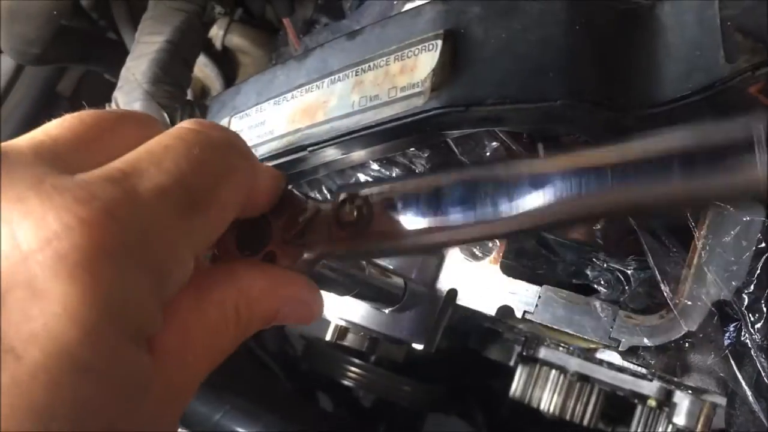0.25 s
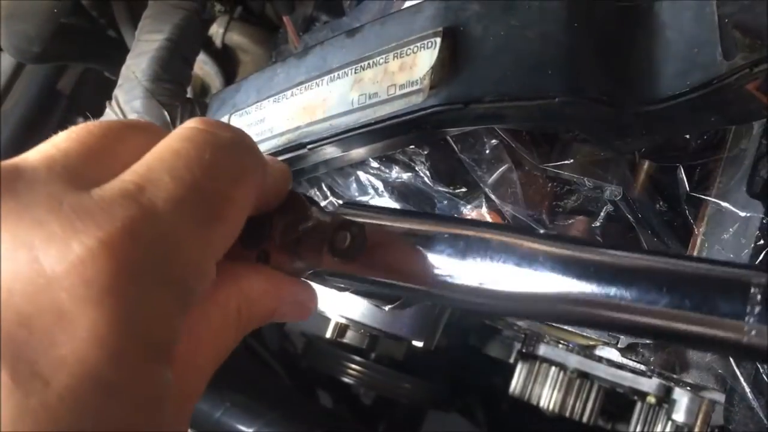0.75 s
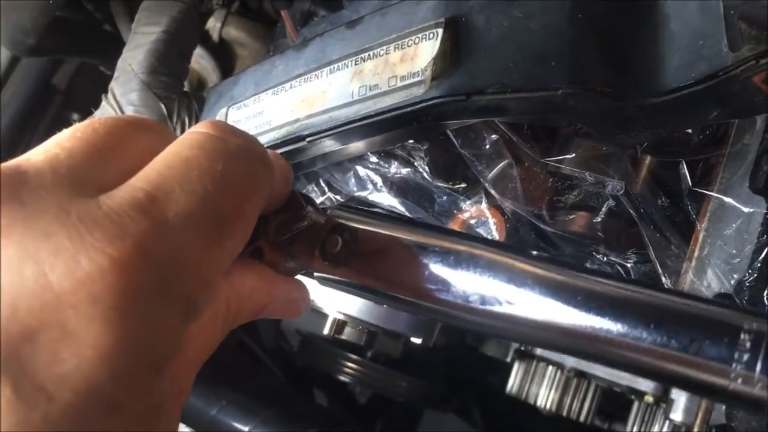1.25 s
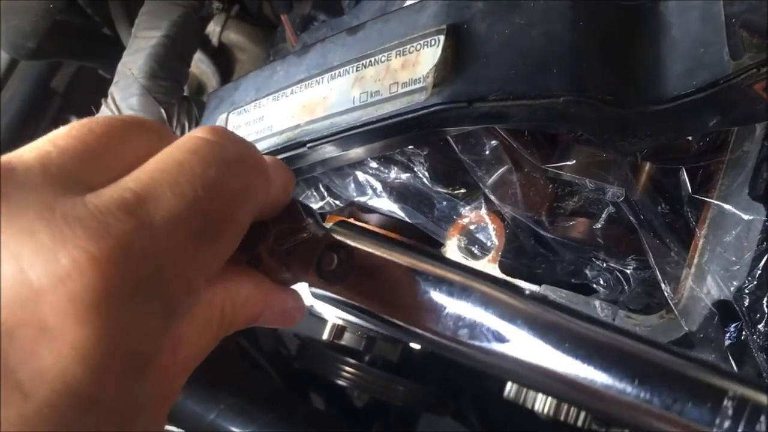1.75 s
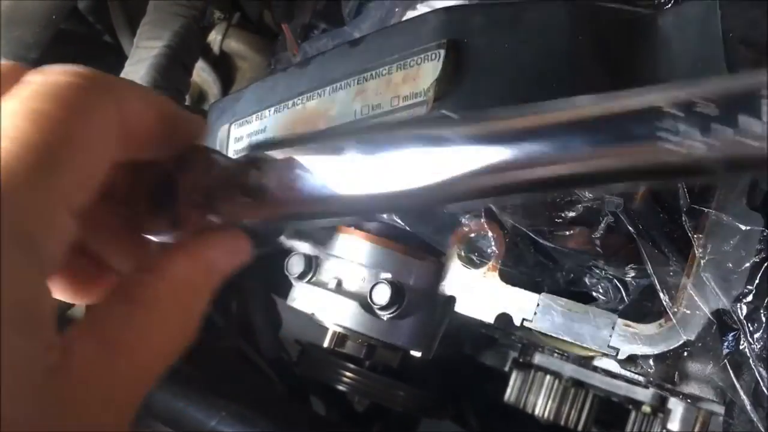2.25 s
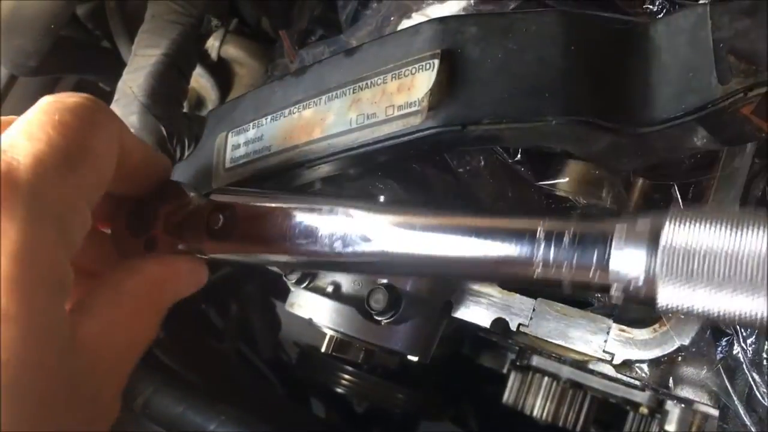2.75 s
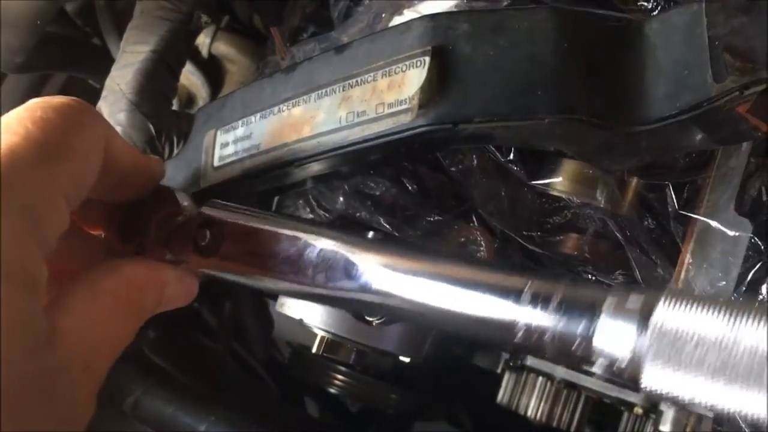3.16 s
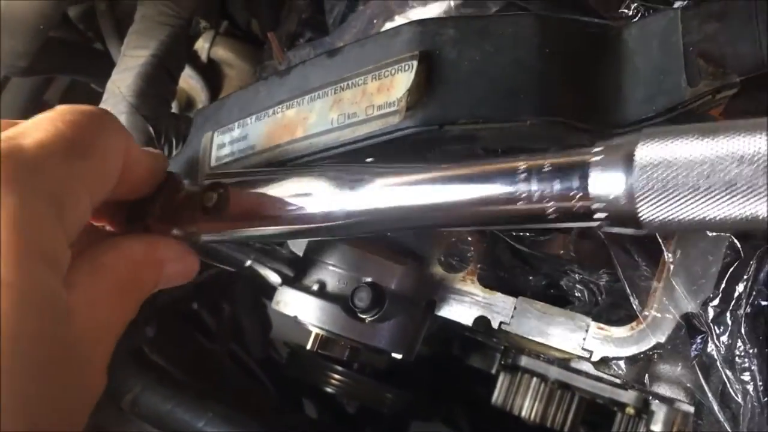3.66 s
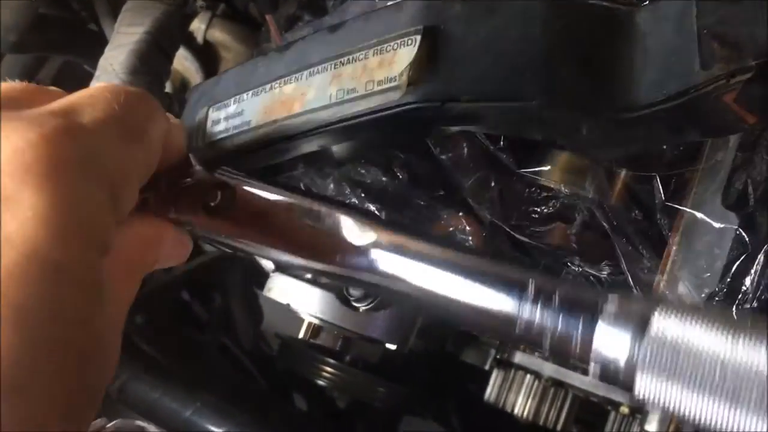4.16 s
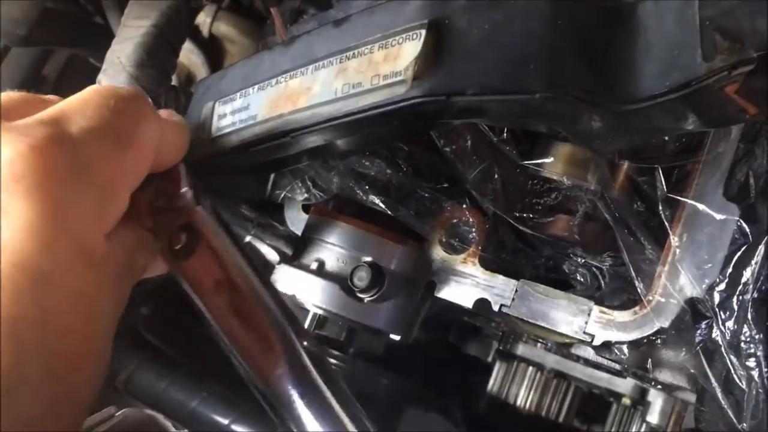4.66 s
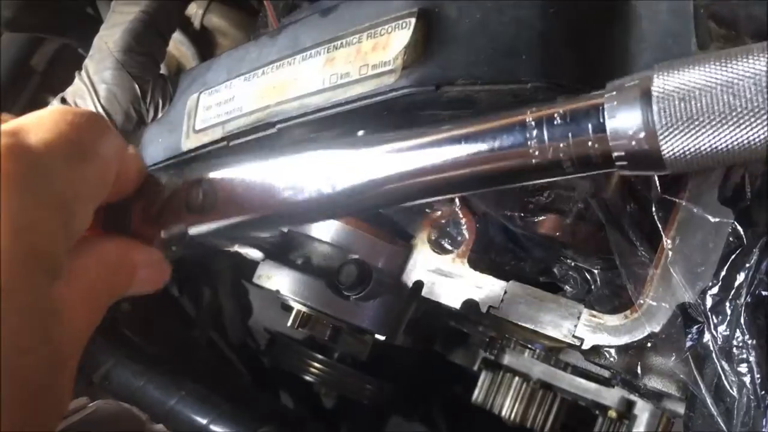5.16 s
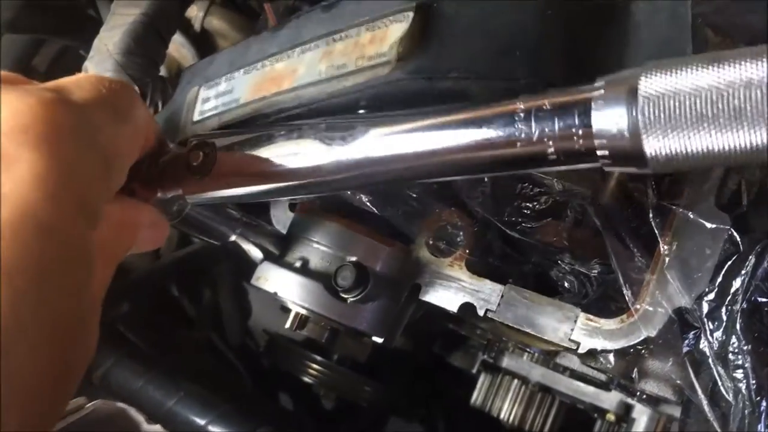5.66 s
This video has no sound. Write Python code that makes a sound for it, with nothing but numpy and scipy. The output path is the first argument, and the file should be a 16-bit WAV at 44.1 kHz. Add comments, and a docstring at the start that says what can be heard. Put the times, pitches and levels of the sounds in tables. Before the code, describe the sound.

Close steel clicks, socket rattles and two sharp ringing snaps from a click-type wrench, over the faint low rumble of a garage.

```python
"""A click-type torque wrench is worked on an engine bolt in a garage, close to the microphone.
Pawl, handle and socket click, clack and knock: quick blows excite damped steel modes and noise bursts.
Once the wrench creaks, snaps and breaks over with a loud, rattling click that rings in its tube.
A hand rubs on the tool in runs of tiny slips; enclosed reflections, made of decaying noise, follow the blows.
Behind lie a low rumble and drone, a far wash and hiss of coloured noise, and a faint sine hum."""
import sys
import numpy as np
from scipy import signal
from scipy.fft import rfft, irfft
from scipy.io import wavfile
from scipy.ndimage import uniform_filter1d

SR = 44100
rng = np.random.default_rng(int(sys.argv[2]) if len(sys.argv) > 2 else 0)


def pcm_store(signal):
    """Save signal as 16-bit PCM."""
    levels = np.round(np.clip(np.atleast_2d(signal), -1, 1) * 32767)
    wavfile.write(sys.argv[1], SR, levels.astype(np.int16).T)


N = 261072
TIME_S = np.arange(N) / SR

# Background colours. Each row: frequency in Hz, relative density in dB.
RUMBLE_TONE = [(20, -24.5), (32, -20), (43, -1.5), (55, -1), (67, 1), (92, -0.5), (110, -17), (160, -47.5),
               (300, -110)]
DRONE_TONE = [(30, -66.5), (75, -24.5), (100, -5), (128, 3), (158, -7.5), (187, -9), (225, -12.5),
              (295, -20.5), (340, -28.5), (450, -51), (730, -120)]
FAR_TONE = [(190, -38.5), (330, -9.5), (365, -1), (477, -12.5), (554, -6.5), (717, -6.5), (831, -5),
            (1030, -6), (1160, -14), (1260, -10), (1820, -18.5), (1960, -20), (3000, -28.5), (3900, -63.5),
            (6600, -120)]
MIC_HISS_TONE = [(1760, -29.5), (3000, -3.5), (4220, -6.5), (4850, -11), (5490, -6.5), (6220, -6.5),
                 (7510, -9), (8810, -7), (11000, -7.5), (12500, -0.5), (15000, -6), (15800, -4.5)]
# Slow background levels, before a small trim. Each row: time in seconds, level in dB.
RUMBLE_CURVE = [(0, -48.5), (.7, -49), (1.4, -53), (2.3, -46.5), (3.5, -52.5), (4.7, -52.5), (5.9, -49)]
DRONE_CURVE = [(0, -48), (.5, -46.5), (1.3, -50.5), (2.3, -50.5), (3.8, -54), (5.9, -49.5)]
FAR_CURVE = [(0.0, -62), (0.26, -58), (2.26, -59.5), (2.62, -62.5), (4.55, -64), (5.92, -60)]
MIC_HISS_DB = -69.37
HUM_HZ, HUM_DB, HUM_FADES_AT_S, HUM_FADE_DB_PER_S = 181.5, -60, 3.88, 5

# Ring time of the garage. Each row: frequency in Hz, t60 in seconds.
GARAGE_DECAY = [(400, 0.61), (1200, 0.25), (3000, 0.29), (6000, 0.17), (14000, .14)]
# Colour of the garage's tail. Each row: frequency in Hz, level in dB.
GARAGE_COLOUR = [(300, -7), (900, 5.5), (1600, 2.5), (3200, -6.5), (5000, -10), (8500, -10), (11000, -16.5),
                 (16000, -24.5)]
# Colour of the engine bay's reflections. Each row: frequency in Hz, level in dB.
BAY_REFLECTION_COLOUR = [(3300, 8), (7000, -8.5), (15000, -10.5)]
# Pitches the engine bay favours in a blow. Each row: frequency in Hz, level in dB.
BAY_COLOUR = [(300, -4), (560, 4.5), (790, -3), (1000, 0.5), (1130, -1), (1300, -1), (1610, 1.5),
              (2000, -2), (2330, 0.5), (2700, -0.5), (3300, 3.5), (4800, -0.5), (8900, 0), (10500, -5),
              (14000, -1.5), (16000, -4.5)]
# Dense modes of the handle's tube. Each row: frequency in Hz, level in dB.
TUBE_COLOUR = [(900, -24.5), (1300, -6.5), (1550, 0.5), (2100, -4), (3000, 6), (3700, -4), (5100, -7),
               (7000, -14.5), (14000, -24)]
BAY_T60_S, TUBE_T60_S = 0.085, 0.19

# Tail of an earlier clack. Each row: frequency in Hz, relative density in dB.
OPENING_COLOUR = [(400, -4), (1500, 0), (3800, 0), (7000, -9), (15000, -23)]
OPENING_DB, OPENING_T60_S = -48.5, 0.26

# Modes of wrench and socket under load, damped by the hand.
# Each row: frequency in Hz, strength in dB, t60 in seconds.
LOADED_MODES = [(640, -8, 0.043), (986, 4.5, 0.044), (1263, -4, 0.06), (1590, 1.5, 0.029),
                (1620, 10.5, 0.024), (1736, -4, 0.072), (1896, -6, 0.087), (2165, -7.5, 0.03),
                (2590, -2.5, 0.065), (3000, -0.5, 0.034), (3320, -3, .04), (3450, -0.5, 0.0053),
                (4125, 2, 0.023), (3790, -7.5, 0.023), (4594, -8.5, 0.028), (5170, 4.5, .022),
                (5680, 4, 0.03), (6290, -4.5, .02), (7100, -1, 0.013), (7270, 1, .018), (9000, 1.5, 0.0097),
                (8950, 4.5, .015), (9850, -0.5, .016), (11000, 0, 0.018), (13500, -3, 0.018),
                (13800, -1, .013)]
# Modes of the loose wrench and socket. Each row: frequency in Hz, strength in dB, t60 in seconds.
LOOSE_MODES = [(595, 3, 0.04), (992, 6, 0.053), (1353, 1, .045), (1680, 2, 0.05), (1984, -1, 0.048),
               (2440, 2, 0.043), (2800, 3, 0.039), (3200, 3.5, .035), (3590, 3.5, .032), (4290, -5, 0.037),
               (5500, 4, 0.024), (6900, 9, .02)]
# Modes of socket on bolt head. Each row: frequency in Hz, strength in dB, t60 in seconds.
BOLT_MODES = [(690, -5.5, .03), (976, 10, .028), (950, -6, .026), (1265, 9, 0.032), (1333, 4, 0.023),
              (1767, -8.5, .03), (2080, 9, 0.03), (2381, 6.5, 0.029), (3440, 7, 0.015), (3893, -5.5, 0.03),
              (4400, 6.5, 0.034), (5876, 3, 0.013), (6620, 0, 0.022), (7040, -2.5, 0.017)]

# Strokes of hand and tool. Each row: start in seconds, hold in seconds, level in dB.
RUB_STROKES = [(.46, 0.07, -64.5), (2.23, 0.0075, -58.5), (5.16, .01, -67), (5.285, 0.015, -60),
               (5.39, 0.072, -65), (5.577, 0.0018, -52.5), (5.61, .08, -52.5), (5.76, 0.036, -66.5)]
# Creaks of the spring-loaded block before it lets go. Each row: start in seconds, hold in seconds, level in dB.
CREAK_STROKES = [(3.4605, 0.0035, -52), (3.466, .003, -43.5)]
# Colour of sliding contact. Each row: frequency in Hz, relative level in dB.
RUB_COLOUR = [(400, -2.5), (1000, 5.5), (2300, -2), (3600, -2.5), (5000, -8), (9000, -5), (15000, -8)]
RUB_RISE_DB_PER_S, RUB_FALL_DB_PER_S = 600, 700
CREAK_RISE_DB_PER_S, CREAK_FALL_DB_PER_S = 5999, 2500

# Edges in Hz of the six ranges over which a contact's force is spread.
FORCE_EDGES_HZ = [300, 750, 1150, 2000, 4500, 9000, 16000]
TILT_PIVOT_HZ = 3000
# Spread over those ranges. Columns: thud, knock, clack, clank, clink and tick, all in dB.
TOUCH_SPREAD_DB = [-7.5, -5.5, -3, -.5, 3, -11]
WOBBLE_SPREAD_DB = [-10.5, -5.5, 0, 0.5, -10.5, -23]
KNOCK_SPREAD_DB = [-9.5, -1, -1.5, -5.5, -15, -17]
SEATING_SPREAD_DB = [-20.5, -3, 3.5, 0.5, -4.5, -18]
CLICK_SPREAD_DB = [-11.5, -8, -2, -2, 1.5, -2]
SNAP_SPREAD_DB = [-23.5, -16, -3, 1, 2, 0]
RELEASE_SPREAD_DB = [-18.5, -21.5, -8.5, -0.5, 4.5, -1]

# A contact touches, then seats. Each row: delay in seconds, strength in dB.
SEATING_BLOWS = [(0, 1), (.0004, -3.5)]
# A wobble rattles several times before it rests. Each row: delay in seconds, strength in dB.
RATTLE_BLOWS = [(0, -6), (.0011, -9.5), (.0028, -12.5), (.0048, -23.5)]
# The tilting block unseats, strikes the tube and bounces. Each row: delay in seconds, strength in dB.
BREAK_OVER_BLOWS = [(0, -15), (.0017, 0), (.0036, 0), (.0055, -6)]

# Each row of the next seven tables: start in seconds, strength in dB, tilt in dB per octave, after-ring in dB.
# Light touches of the socket as the handle swings back.
TOUCH_EVENTS = [(0.4694, -68.5, -4.5, 11.5), (0.639, -76.5, -2.5, 13.5), (0.712, -72, -4, 8),
                (2.1621, -68, 0, 11), (2.257, -64, -4, -17), (2.4218, -66, -1.5, -1),
                (3.0506, -57.5, 2.5, -7.5), (3.0795, -62.5, 0.5, 4.5), (3.6505, -64.5, -1.5, -6),
                (4.0877, -74, -1, 10), (4.1231, -64.5, -2, -7), (4.9527, -69, -2, -4),
                (5.1199, -62.5, 0.5, -0.5)]
# The slack wrench wobbles in the play of its socket.
WOBBLE_EVENTS = [(0.1616, -63, -5.5, 9), (0.1931, -54.5, 3.5, -3), (0.435, -42.5, 1.2, -5),
                 (0.5832, -59, -0.5, 2), (2.0134, -38.5, 4, 1.5), (2.244, -57.5, -0.5, -13),
                 (3.5729, -44.5, 4.5, 2.5), (5.1468, -43, 2, -2), (5.174, -49.5, -1.5, 1),
                 (5.2471, -45, -0.5, 2.5), (5.4376, -48, -4, 6.5), (5.5783, -44, -2, -18),
                 (5.6008, -46.5, -1.5, -7), (5.7514, -60.5, -3.5, 10.5), (5.8577, -62.5, -4, 5)]
# The socket rocks on the bolt head with a dull knock.
KNOCK_EVENTS = [(3.733, -48.5, -1, -4), (3.8572, -53, 0, -11), (5.6432, -44, 0.5, -7),
                (5.6666, -46.5, 2, -14)]
# The socket is set down on the next bolt head.
SEATING_EVENTS = [(2.3951, -36, -1.2, -7), (2.5427, -28.5, 0, -5)]
# Hard clicks of the pawl and square drive.
CLICK_EVENTS = [(0.1282, -70.5, 7, -8), (0.1345, -66, 1, 15.5), (0.3143, -52.5, 10.5, -6),
                (0.334, -46, 8, -5.5), (0.447, -68, 11.5, 2), (0.9942, -96, 15.5, 0), (1.9211, -97, 20, -5),
                (2.2185, -73, 8, 11), (3.6357, -62.5, 4, -1), (4.1516, -61, 1.5, 0),
                (4.1902, -35.5, 0.5, -5.5), (4.5591, -35, 0.5, -9), (5.159, -57.5, 6, 14.5),
                (5.189, -74, 11.5, 3), (5.8851, -96, 17, 0)]
# The spring-loaded block snaps against the tube.
SNAP_EVENTS = [(2.7815, -25, 0.098, 0.5), (3.4682, -43.5, 0.5, -7)]
# The wrench breaks over at the set torque.
RELEASE_EVENTS = [(3.4795, -21, 0.0036, 0)]

# The ring faces the microphone, the crack spreads all round: their sends to the room.
RING_SEND_DB, CRACK_SEND_DB = -4, -1
SNAP_OVER_CRACK_DB = 5
LOW_CUT_HZ, HIGH_CUT_HZ, OVERLOAD = 22, 15800, 0.85


def from_db(db):
    """Decibels to gain."""
    return 10 ** (np.asarray(db) / 20)


def rms_one(x):
    """Scale to an rms of 1."""
    return x / np.sqrt(np.mean(x ** 2) + 1e-20)


def in_time(rows):
    """Interpolate a level curve at every sample."""
    s, db = np.transpose(rows)
    return np.interp(TIME_S, s, db)


def at_hz(points, hz):
    """Read a table on a log-frequency axis."""
    table_hz, values = np.transpose(points)
    return np.interp(np.log(np.maximum(hz, 1)), np.log(table_hz), values)


def hz_axis(size):
    """Frequencies of the spectrum of that many samples."""
    return np.arange(size // 2 + 1) * SR / size


def coloured(x, tone):
    """Filter by a smooth colour of frequency and dB."""
    gain = from_db(at_hz(tone, hz_axis(len(x))))
    return irfft(rfft(x) * gain, len(x))


def band(x, low_hz, high_hz):
    """Butterworth band-pass."""
    return signal.sosfilt(signal.butter(3, [low_hz, high_hz], "band", fs=SR, output="sos"), x)


def dying(t, t60_s):
    """Exponential decay, 60 dB per t60."""
    return from_db(-60 * t / t60_s)


def noise_layer(tone, level_db):
    """Steady coloured noise at a given rms level."""
    return from_db(level_db) * rms_one(coloured(rng.standard_normal(N), tone))


def hum():
    """A faint sine that holds, then fades."""
    level_db = HUM_DB - HUM_FADE_DB_PER_S * np.maximum(TIME_S - HUM_FADES_AT_S, 0)
    return from_db(level_db) * rms_one(np.sin(2 * np.pi * HUM_HZ * TIME_S))


def background():
    """Deep rumble, a low drone, a far wash of noise, a faint hum and the microphone's steady hiss."""
    rumble = noise_layer(RUMBLE_TONE, in_time(RUMBLE_CURVE) + 0.5)
    drone = noise_layer(DRONE_TONE, in_time(DRONE_CURVE) - 0.1)
    far = noise_layer(FAR_TONE, in_time(FAR_CURVE) - 0.13)
    mic_hiss = noise_layer(MIC_HISS_TONE, MIC_HISS_DB)
    return rumble + drone + far + mic_hiss + hum()


def garage_response(build_s, bay_db=6.0, size=20000):
    """Quick reflections of the engine bay plus the garage's tail, which mostly dies sooner in the treble."""
    t = np.arange(size) / SR
    edges_hz = np.geomspace(250, 17000, 11)
    tail = np.zeros(size)
    for low_hz, high_hz in zip(edges_hz, edges_hz[1:]):
        t60_s = at_hz(GARAGE_DECAY, np.sqrt(low_hz * high_hz))
        tail += band(rng.standard_normal(size), low_hz, high_hz) * dying(t, t60_s)
    build = 1 - np.exp(-t / build_s)
    tail = coloured(tail, GARAGE_COLOUR) * build
    bay = coloured(rng.standard_normal(size), BAY_REFLECTION_COLOUR) * dying(t, BAY_T60_S) * build
    return tail / np.linalg.norm(tail) + from_db(bay_db) * bay / np.linalg.norm(bay)


def tube_ring(ring_db, size=20000):
    """Lingering ring of the handle's hollow tube: dense modes, as decaying coloured noise."""
    ring = coloured(rng.standard_normal(size), TUBE_COLOUR) * dying(np.arange(size) / SR, TUBE_T60_S)
    return from_db(ring_db) * ring / np.linalg.norm(ring)


def opening():
    """Diffuse tail of an earlier clack, dying away in the garage from the start."""
    tail = rms_one(coloured(rng.standard_normal(N), OPENING_COLOUR))
    return from_db(OPENING_DB) * dying(TIME_S, OPENING_T60_S) * tail


def steel_blow(t, modes, crack_db, crack_t60_s, snap_db, snap_t60_s, spread_db):
    """One blow: a hard snap, a crack of countless short modes, and main modes of random sign and strength."""
    hz, db, t60_s = np.transpose(modes)[:, :, None]
    strength = from_db(db + spread_db * rng.standard_normal(hz.shape)) * rng.choice([-1, 1], hz.shape)
    ring = np.sum(strength * np.sin(2 * np.pi * hz * t) * dying(t, t60_s), axis=0)
    burst = from_db(crack_db) * dying(t, crack_t60_s) + from_db(snap_db) * dying(t, snap_t60_s)
    return ring + burst * rng.standard_normal(len(t))


def strokes(rows, rise_db_per_s, fall_db_per_s):
    """Gain of a run of strokes: each swells, holds and dies away."""
    gain = np.zeros(N)
    for start_s, held_s, db in rows:
        rise_db = rise_db_per_s * np.maximum(start_s - TIME_S, 0)
        fall_db = fall_db_per_s * np.maximum(TIME_S - start_s - held_s, 0)
        gain += from_db(db - rise_db - fall_db)
    return gain


def sliding(gain, slips_per_s, ring_db, clump_db, size=2048):
    """Sliding contact: tiny random slips, in clumps, set the loose steel ringing."""
    slips = (rng.random(N) < slips_per_s / SR) * rng.standard_normal(N)
    clumps = rms_one(uniform_filter1d(rng.standard_normal(N), size=300))
    slips *= from_db(clump_db * clumps)
    steel = steel_blow(np.arange(size) / SR, LOOSE_MODES, crack_db=18.5, crack_t60_s=0.037,
                       snap_db=10.0, snap_t60_s=0.0042, spread_db=3.5)
    ring = rms_one(signal.fftconvolve(slips, steel)[:N])
    sound = rms_one(slips) + from_db(ring_db) * ring
    return gain * rms_one(coloured(sound, RUB_COLOUR))


def hand_rub():
    """Hand and tool rub in short strokes of dense slips."""
    gain = strokes(RUB_STROKES, RUB_RISE_DB_PER_S, RUB_FALL_DB_PER_S)
    return sliding(gain, slips_per_s=7000, ring_db=-3.5, clump_db=2.5)


def block_creak():
    """The spring-loaded block creaks: sparser slips, more ring."""
    gain = strokes(CREAK_STROKES, CREAK_RISE_DB_PER_S, CREAK_FALL_DB_PER_S)
    return sliding(gain, slips_per_s=3000, ring_db=7.5, clump_db=-0.5)


def voiced(hit, levels_db):
    """Set a hit's level in each force range, its energy counted as rms over 12 ms."""
    edges_hz, hz = np.array(FORCE_EDGES_HZ), hz_axis(len(hit))
    centres_hz = np.sqrt(edges_hz[1:] * edges_hz[:-1])
    spectrum = rfft(hit)
    # the smooth correction leaks between ranges, so repeat it
    for _ in range(3):
        energy = np.histogram(hz, edges_hz, weights=np.abs(spectrum) ** 2)[0] * 2 / len(hit)
        now_db = 10 * np.log10(energy / (0.012 * SR))
        spectrum = spectrum * from_db(at_hz(np.c_[centres_hz, levels_db - now_db], hz))
    return irfft(spectrum, len(hit))


def strikes(rows, spread_db, modes, blows, room, level_db, room_db, crack_db, crack_t60_s, size=4096):
    """Each event is a few quick blows on the steel, followed by the ring of the room."""
    out, lead = np.zeros(N + SR), size // 32
    t, edges_hz = np.arange(size) / SR, np.array(FORCE_EDGES_HZ)
    octaves = np.log2(np.sqrt(edges_hz[1:] * edges_hz[:-1]) / TILT_PIVOT_HZ)
    for start_s, strength_db, tilt_db, after_db in rows:
        hit, crack = np.zeros((2, size))
        for delay_s, db in blows:
            first = lead + int(delay_s * SR)
            t_blow = t[:size - first]
            blow = steel_blow(t_blow, modes, crack_db, crack_t60_s, crack_db + SNAP_OVER_CRACK_DB,
                              snap_t60_s=0.0025, spread_db=0.04)
            hit[first:] += from_db(db) * blow
            crack[first:] += from_db(db) * dying(t_blow, 0.0027) * rng.standard_normal(size - first)
        levels_db = np.array(spread_db) + level_db + strength_db + tilt_db * octaves
        hit = voiced(coloured(hit, BAY_COLOUR), levels_db)
        crack = voiced(coloured(crack, BAY_COLOUR), levels_db)
        sent = from_db(RING_SEND_DB) * hit + from_db(CRACK_SEND_DB) * crack
        sound = from_db(room_db + after_db) * signal.fftconvolve(sent, room)
        sound[:size] += hit
        at = round(start_s * SR) - lead
        out[at:at + len(sound)] += sound
    return out[:N]


def socket_touches(room):
    """Light contacts on the loaded steel, touching then seating."""
    return strikes(TOUCH_EVENTS, TOUCH_SPREAD_DB, LOADED_MODES, SEATING_BLOWS, room,
                   level_db=1.9, room_db=-19.5, crack_db=15, crack_t60_s=0.029)


def socket_wobbles(room):
    """Slack steel rattles several times in its play."""
    return strikes(WOBBLE_EVENTS, WOBBLE_SPREAD_DB, LOOSE_MODES, RATTLE_BLOWS, room,
                   level_db=-1.5, room_db=-23.5, crack_db=16.5, crack_t60_s=0.032)


def socket_knocks(room):
    """The rocking socket rattles dully against the bolt head."""
    return strikes(KNOCK_EVENTS, KNOCK_SPREAD_DB, BOLT_MODES, RATTLE_BLOWS, room,
                   level_db=0.4, room_db=-22.0, crack_db=18.5, crack_t60_s=0.028)


def socket_seatings(room):
    """The socket touches and seats on a bolt head, ringing both."""
    return strikes(SEATING_EVENTS, SEATING_SPREAD_DB, BOLT_MODES, SEATING_BLOWS, room,
                   level_db=1.0, room_db=-25.5, crack_db=16.5, crack_t60_s=0.025)


def ratchet_clicks(room):
    """Pawl and square drive strike hard on the loaded steel."""
    return strikes(CLICK_EVENTS, CLICK_SPREAD_DB, LOADED_MODES, SEATING_BLOWS, room,
                   level_db=-0.9, room_db=-19.0, crack_db=15, crack_t60_s=0.024)


def block_snaps(room):
    """The block snaps against the tube, which rings on."""
    return strikes(SNAP_EVENTS, SNAP_SPREAD_DB, LOADED_MODES, SEATING_BLOWS, room,
                   level_db=0.0, room_db=-21, crack_db=15.5, crack_t60_s=0.026)


def torque_release(room):
    """At break-over the tilting block strikes and bounces in the ringing tube."""
    return strikes(RELEASE_EVENTS, RELEASE_SPREAD_DB, LOADED_MODES, BREAK_OVER_BLOWS, room,
                   level_db=-1.0, room_db=-22, crack_db=13.5, crack_t60_s=0.027)


def scene():
    """The wrench close by, over the garage's background."""
    garage = garage_response(build_s=0.0089)
    garage_and_tube = garage_response(build_s=0.006) + tube_ring(ring_db=-2.5)
    sliding_parts = hand_rub() + block_creak()
    socket = socket_touches(garage) + socket_wobbles(garage) + socket_knocks(garage) + socket_seatings(garage)
    wrench = ratchet_clicks(garage) + block_snaps(garage_and_tube) + torque_release(garage_and_tube)
    return (background() + opening() + sliding_parts + socket + wrench)[None]


def record(dry):
    """The deepest bass is cut, the highest peaks overload and the top is cut."""
    low_cut = signal.butter(6, LOW_CUT_HZ, "high", fs=SR, output="sos")
    high_cut = signal.ellip(10, 0.2, 80, HIGH_CUT_HZ, fs=SR, output="sos")
    clipped = np.clip(signal.sosfilt(low_cut, dry), -OVERLOAD, OVERLOAD)
    return signal.sosfilt(high_cut, clipped)


dry = scene()
out = record(dry)
pcm_store(out)
```